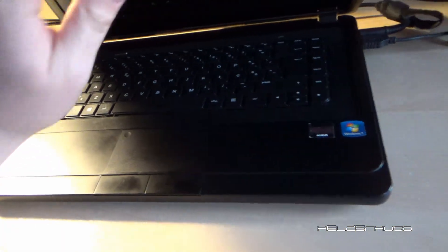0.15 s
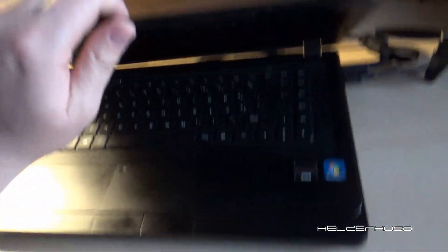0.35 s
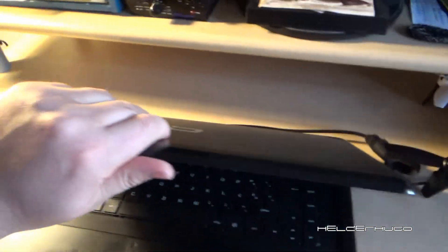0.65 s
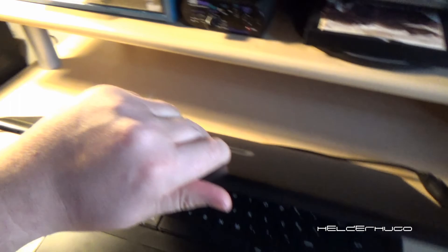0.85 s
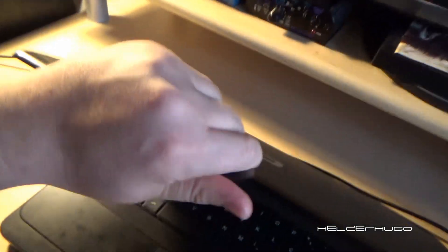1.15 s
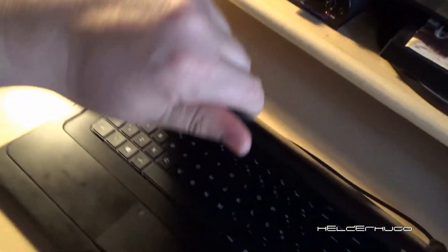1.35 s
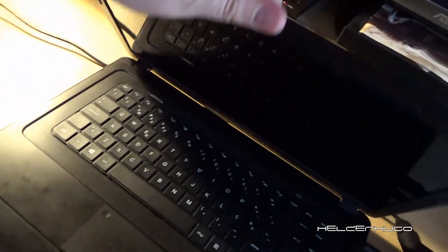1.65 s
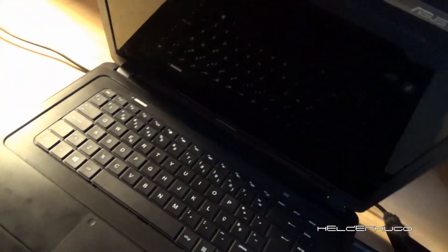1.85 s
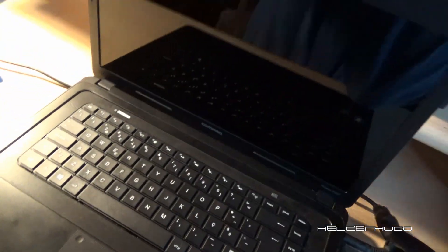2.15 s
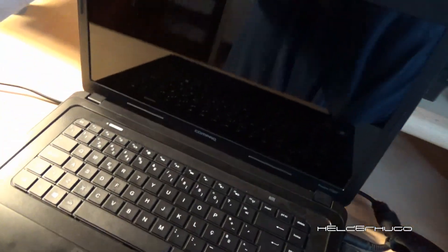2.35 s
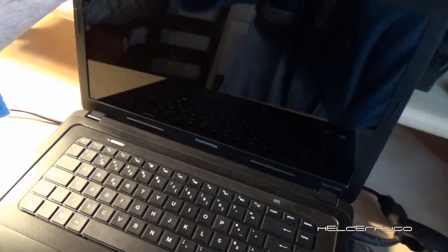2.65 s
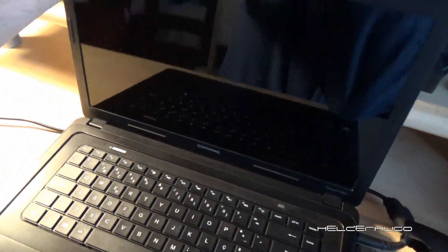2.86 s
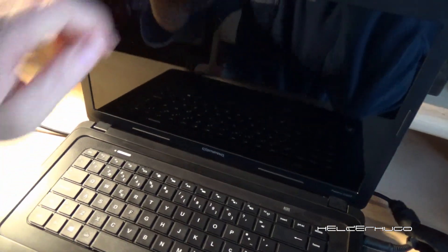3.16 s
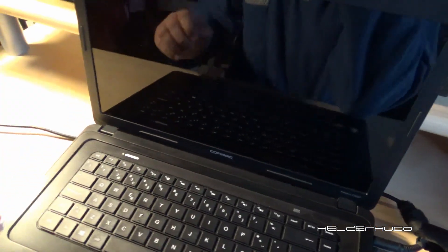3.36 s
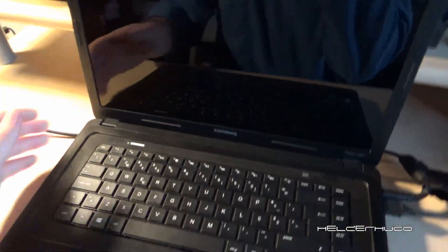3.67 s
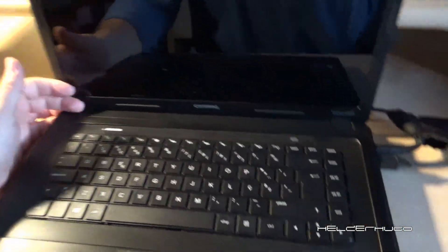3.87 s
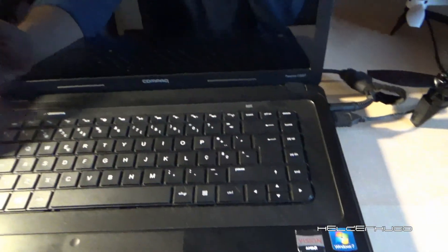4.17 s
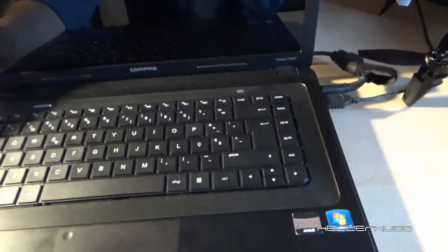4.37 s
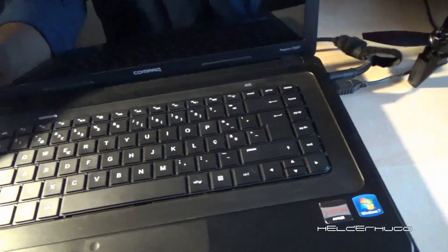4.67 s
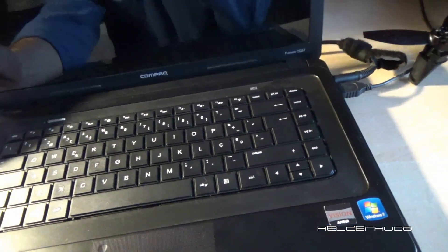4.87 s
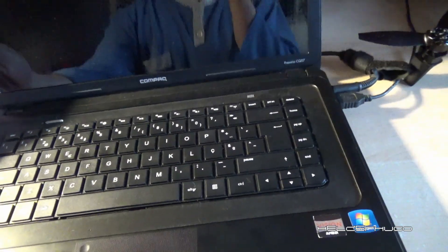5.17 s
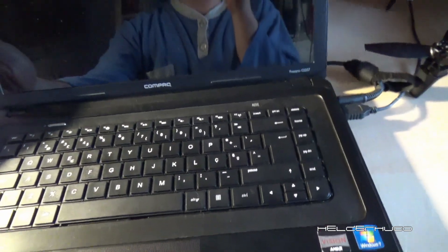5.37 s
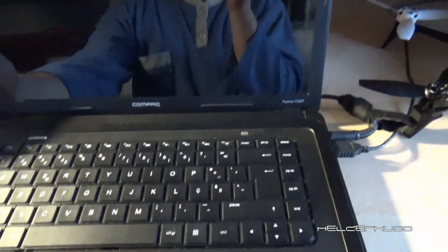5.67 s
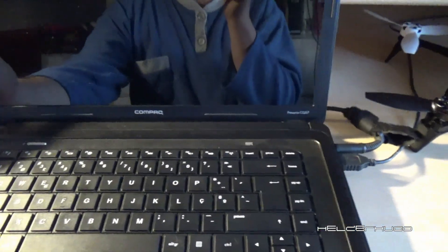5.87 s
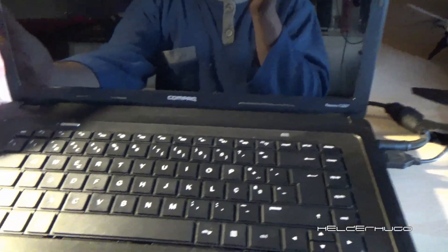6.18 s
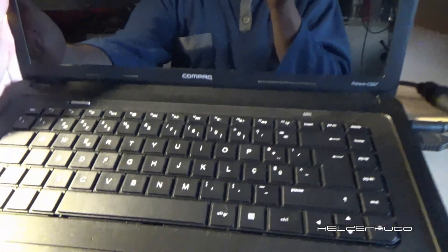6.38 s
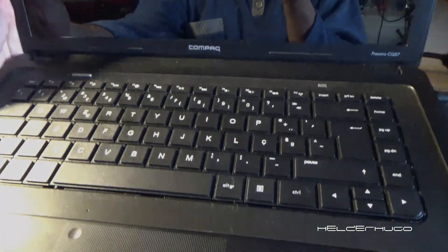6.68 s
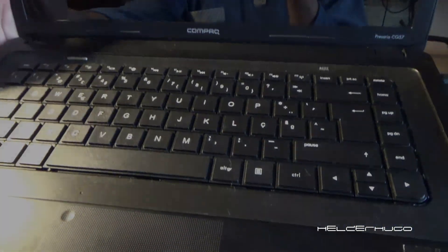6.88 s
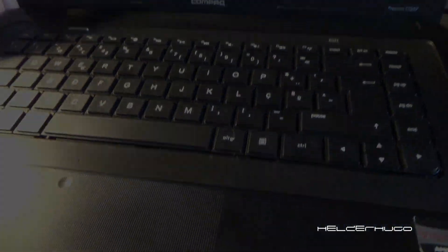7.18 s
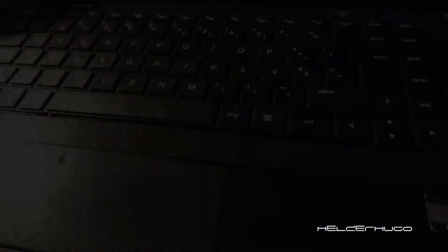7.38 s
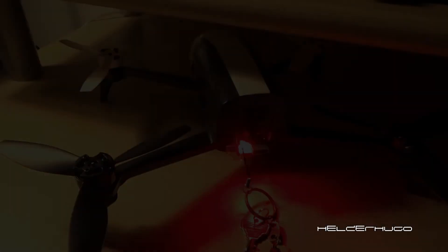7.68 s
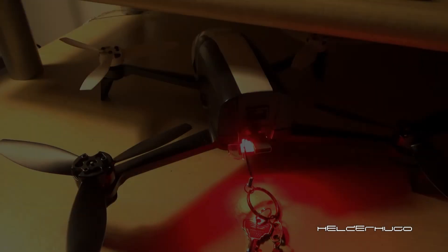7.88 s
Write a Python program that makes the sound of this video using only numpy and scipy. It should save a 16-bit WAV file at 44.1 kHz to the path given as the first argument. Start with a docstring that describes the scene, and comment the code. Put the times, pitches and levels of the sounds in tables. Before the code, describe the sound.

Close to the microphone in a small quiet room, a laptop lid rubs and its hinge scrapes with a burst of plastic clicks. Then heavy hammer blows from building work boom through the walls, a little under a second apart, with light case clicks and a short creak between. Blows and room tone fade, the last weaker, and a thin fan whine rises.

```python
"""Heavy hammer blows from building work come through the walls, a little under a second apart, and boom.
Close by, a hand opens a laptop: the lid rubs, the hinge scrapes, the plastic case clicks and creaks.
After the fifth blow the blows and room tone fade, to end early in the sixth; a small fan's thin whine fades in.
Blows are wave fronts, modes and a dense noise ring; clicks are noise bursts and shell modes;
rubbing is grainy noise through the shell's resonances; hum and fan are unsteady sines over coloured noise."""
import sys
import numpy as np
from scipy import signal
from scipy.fft import rfft, irfft, next_fast_len
from scipy.io import wavfile
from scipy.ndimage import uniform_filter1d

SR = 44100
rng = np.random.default_rng(int(sys.argv[2]) if len(sys.argv) > 2 else 0)


def transcribe(u):
    """Save the signal u as a 16-bit wav file named by the first command-line argument.

    u: samples, shape (n,) or (channels, n), limited to [-1, 1]; the rate is SR.
    q: integer samples, one column per channel.
    """
    v = np.clip(np.atleast_2d(u).T, -1, 1)
    q = np.round(v * 32767).astype(np.int16)
    wavfile.write(sys.argv[1], SR, q)


N = 354255
TIME = np.arange(N) / SR
FADE_OUT_S, CUT_S, FADE_IN_S = 6.626, 7.598, 8.35  # fade-out starts, silence between, fade-in ends

# push that turns the lid: (start [s], attack [s], hold [s], release t60 [s], level [dB])
LID_PUSH = (0.3945, 0.2047, 0.25, 0.46, -40.5)


def amp(db):
    """Decibels to gain."""
    return 10 ** (np.asarray(db) / 20)


def unit(x):
    """x at rms 1."""
    return x / np.sqrt(np.mean(x ** 2) + 1e-20)


def even(x):
    """Each channel at energy 1."""
    return x / np.linalg.norm(x, axis=1, keepdims=True)


def along(points, hz):
    """Interpolate (Hz, value) points on a log frequency axis."""
    f, v = np.transpose(points)
    return np.interp(np.log(hz + 1), np.log(f + 1), v)


def filtered(x, response):
    """Multiply the spectrum of x by a response of frequency."""
    n = x.shape[-1]
    m = next_fast_len(n + 8192)  # zero padding
    return irfft(rfft(x, m) * response(np.fft.rfftfreq(m, 1 / SR)), m)[..., :n]


def band(x, lo_hz, hi_hz):
    """A causal band-pass."""
    sos = signal.butter(3, [lo_hz, min(hi_hz, SR / 2 - 1)], "band", fs=SR, output="sos")
    return signal.sosfilt(sos, x)


def add(track, s, sound):
    """Mix a sound into a track at time s."""
    part = track[..., round(s * SR):][..., :sound.shape[-1]]
    part += sound[..., :part.shape[-1]]


def spread(pair, alike):
    """Two unrelated signals become left and right of a given likeness per frequency."""
    def turn_rad(hz):
        return np.arccos(np.clip(along(alike, hz), 0, 1)) / 2

    mid, side = filtered(pair, lambda hz: np.array([np.cos(turn_rad(hz)), np.sin(turn_rad(hz))]))
    return np.array([mid + side, mid - side])


def rush(spectrum):
    """Coloured stereo noise of rms 1."""
    # (frequency [Hz], left-right likeness [0..1])
    likeness = [(60, 1.0), (180, 0.99), (550, 0.79), (1650, 0.49), (4970, 0.75), (15000, 1)]
    noise = filtered(rng.standard_normal((2, N)), lambda hz: amp(along(spectrum, hz)))
    return unit(spread(noise, likeness))


def mode(t, hz, t60, rise):
    """A resonance that builds up and dies away."""
    return np.sin(2 * np.pi * hz * t) * amp(-60 * t / t60) * (1 - np.exp(-t / rise))


def hammer():
    """Every blow takes the same paths through the building; the ring changes as the strike spot moves."""
    # (time [s], level [dB], hardness: treble gain [dB])
    strikes = [(3.0337, -0.5, -7), (3.9058, 1, -10.5), (4.748, 1, -6.5), (5.6276, 1, -9.5),
               (6.5383, 0.5, -13), (7.3908, -3, -14.5)]
    # wave fronts and echoes of a blow: (delay [s], frequency [Hz], level [dB], half length [s])
    fronts = [(0.014, 381.8, 1.5, 0.0029), (0.0214, 307.7, -2.5, 0.0023), (0.049, 288.8, -7.5, .005),
              (.062, 183.3, -7, 0.01), (0.147, 190, -18, 0.0064), (0.218, 191.5, -30.5, 0.0073)]
    # modes of wall and room: (frequency [Hz], level [dB], t60 [s], build-up [s])
    boom_modes = [(113.8, -12, 0.55, 0.1), (169.2, -12.5, .52, 0.092), (176, -34.5, 0.73, .05),
                  (234, -25, 0.99, 0.017), (298.8, -11, 0.44, 0.037), (327, -22.5, 0.37, .02),
                  (400, -7.5, 0.14, 0.013), (467.6, -18, 0.49, 0.0082), (522, -19, 0.14, 0.015),
                  (649.5, -17, 0.45, 0.006), (826, -19, 0.32, 0.0087), (867, -22.5, 0.64, .012),
                  (1244, -24.5, 0.52, 0.0069)]
    spot_step_rad = 0.48
    t, out = np.arange(SR) / SR, np.zeros((2, N))

    body = sum(amp(db) * mode(t, hz, t60, rise) for hz, db, t60, rise in boom_modes)
    for delay, hz, db, length in fronts:
        body = body + amp(db) * np.sin(2 * np.pi * hz * t) * np.exp(-((t - delay) / length) ** 2)
    here, there = (dense_ring(t, burst_t60=0.12, rise_cycles=4.3) for _ in range(2))

    for k, (s, db, hard_db) in enumerate(strikes):
        spot_rad = k * spot_step_rad
        ring = np.cos(spot_rad) * here + np.sin(spot_rad) * there
        blow = body + amp(0.65) * ring
        blow = filtered(blow, lambda hz: amp(hard_db * along([(300, 0.13), (1000, 1)], hz)))
        add(out, s, amp(db) * blow * (1 - np.exp(-t / .0007)))
    return out


def dense_ring(t, burst_t60, rise_cycles, count=34):
    """Noise bands stand for countless building modes; high bands burst at once, low ones build up slowest."""
    # (frequency [Hz], t60 [s])
    ring_t60 = [(50, 0.73), (150, 0.88), (350, 0.48), (800, 0.56), (2000, 0.67), (6000, 1.2)]
    # hard first burst over the ring: (frequency [Hz], level [dB])
    burst_level = [(150, -16), (400, -8), (700, 4), (1300, 6.5), (3000, 9)]
    # (frequency [Hz], density [dB per Hz])
    masonry = [(30, -26.5), (70, -20.5), (145, -12.5), (195, -5.5), (300, -4), (430, -4.5), (560, -5),
               (800, -4.5), (1020, -13), (1300, -13.5), (1700, -19), (2700, -29.5), (4300, -43),
               (7000, -72)]
    # (frequency [Hz], left-right likeness [0..1])
    likeness = [(60, 0.98), (150, 1), (300, 0.93), (500, .83), (1000, .85), (2000, .25), (5000, .32)]
    out = np.zeros((2, len(t)))
    edges_hz = np.geomspace(25, 12000, count + 1)
    for lo, hi in zip(edges_hz, edges_hz[1:]):
        hz = np.sqrt(lo * hi)
        noise = filtered(rng.standard_normal(out.shape), lambda f: (f >= lo) & (f < hi))
        noise /= np.sqrt(np.abs(uniform_filter1d(noise ** 2, SR // 8)) + 1e-12)  # level its slow swells
        tail = amp(-60 * t / along(ring_t60, hz))
        burst = amp(along(burst_level, hz) - 60 * t / burst_t60)
        rise = 1 - np.exp(-(t / (0.006 + rise_cycles / hz)) ** 2)
        out += even(noise * (tail + burst) * rise) * amp(along(masonry, hz)) * np.sqrt(hi - lo)
    return spread(out, likeness)


def laptop():
    """Lid, hinge and case rub by stick and slip; the shell clicks."""
    # push on the hinge: (start [s], attack [s], hold [s], release t60 [s], level [dB])
    hinge_push = (0.44, 0.08, 0.42, 0.65, -47.5)
    # the case gives under the hand: (start [s], attack [s], hold [s], release t60 [s], level [dB])
    creak_push = (5.704, 0.02, 0.0059, 0.18, -21)
    # rubbed plastic: (frequency [Hz], density [dB per Hz])
    plastic = [(120, -25), (200, -1.5), (450, 1), (900, -8), (1400, -0.5), (2400, -5.5), (3500, -7.5),
               (5300, -17.5), (6600, -16.5), (8700, -16.5), (11700, -25), (16000, -38.5)]
    # scraping hinge: (frequency [Hz], density [dB per Hz])
    hinge_spectrum = [(300, -24), (1500, -12), (2600, 2), (3500, -2.5), (5500, -3), (7000, -6.5),
                      (9000, -7.5), (12000, -15.5), (16000, -24.5)]
    lid = friction(LID_PUSH, plastic, grit_db=3.5, slips=160)
    hinge = friction(hinge_push, hinge_spectrum, grit_db=1.5, slips=300)
    creak = friction(creak_push, plastic, grit_db=4.0, slips=400)
    creak = filtered(creak, lambda hz: amp(along([(1500, 1.5), (4000, -1), (12000, 4.5)], hz)))
    return lid + hinge + creak + clicks()


def clicks():
    """A click is a crunch of contact and a brief shell ring; sharp ones favour high ranges, which die first."""
    # (time [s], level [dB], brightness: gain from range to range [dB],
    #  hollowness: gain of the middle ranges [dB], t60 before each range's share [s])
    case_clicks = [(.414, -21, 3.5, -6.5, 0.084), (.508, -17, -4, -4.5, .022),
                   (.577, -24, -0.5, 1.5, 0.023), (.6, -18, 0.5, -4, 0.015), (.663, -21, -7, -1, 0.056),
                   (.688, -18.5, .5, -4.5, 0.038), (.73, -25, 5, -3, 0.027), (.749, -13, -1.5, -0.5, 0.027),
                   (.769, -7, 6.5, -2, .028), (.778, -1.5, 4.5, 0.5, 0.011), (.828, -19, -6.5, -2.5, .015),
                   (.878, -15.5, -2.5, 4, .023), (.958, -26.5, -3.5, 1, 0.071), (1.015, -23, -5, -8, 0.045),
                   (1.075, -23.5, -4.5, 2, 0.022), (1.229, -10.5, 0, 5, .03),
                   (1.264, -10, -1, -2.5, 0.0389), (1.284, -9, 3, -0.5, 0.043), (1.336, -14, 3.5, -1, .023),
                   (1.369, -17.5, 0.5, 4, .045), (1.377, -15.5, 2, -0.5, 0.052),
                   (2.507, -17.5, -2, -4.5, 0.052), (2.579, -36, -3.5, 3.5, 0.028),
                   (3.79, -15, -1.5, 7.5, .022), (3.872, -23, 5, -2, 0.13), (3.897, -6.5, 6, 1, .03),
                   (4.062, -25.5, 1.5, 2.5, 0.053), (4.393, -27.5, -3, -0.5, .02),
                   (4.711, -20.5, -1.5, 1, .05), (4.761, -22, -1.5, 5, 0.018),
                   (5.291, -19, -7.5, -1, 0.034), (5.559, -25, 0, -1.5, .012), (5.57, -20.5, 3, 4, .022),
                   (5.599, -18, 3, 2.5, .035), (5.825, -15.5, -1, 7, 0.029), (5.894, -26, 4.5, 5.5, .025),
                   (5.942, -21.5, -2.7, 6.5, .02), (6.119, -33.5, -7, -7, .035),
                   (6.228, -25, -2.5, 5.5, .019), (6.568, -29, -5, 9, .03), (7.266, -34.5, 3.5, -3.5, .08),
                   (7.289, -26.5, 4.5, -3.5, .026), (7.309, -30, 0.3, -3, 0.056),
                   (7.348, -35.5, -1.5, 7.5, 0.0083)]
    # shell ranges, knock to snap: (low [Hz], high [Hz], lift [dB], share of the click's t60)
    shell_ranges = [(403, 1000, 6, 1.8), (1000, 2500, 8.5, 1.3), (2560, 5600, 6.5, 0.98),
                    (6320, 11500, -6, 0.62)]
    t, out = np.arange(SR // 6) / SR, np.zeros((2, N))

    start, attack, hold = LID_PUSH[:3]
    handling = ticks(start, FADE_OUT_S, -41.5, count=22)
    slips = ticks(start + attack * .8, start + attack + hold + .08, -29.5, count=12)  # the turning hinge

    steps = np.arange(len(shell_ranges)) - (len(shell_ranges) - 1) / 2
    for s, db, bright_db, hollow_db, t60 in case_clicks + handling + slips:
        click = 0
        for step, (lo, hi, lift_db, share) in zip(steps, shell_ranges):
            envelope = amp(-60 * t / (share * t60)) * (1 - np.exp(-t / 0.00024))
            crunch = band(rng.standard_normal((2, len(t))) * envelope, lo, hi)
            ring = panel(t, lo, hi, 1.2 * share * t60)
            range_db = lift_db + bright_db * step + hollow_db * (1 - abs(step))
            click = click + amp(range_db) * (even(crunch) + amp(-6.0) * even(ring))
        add(out, s, amp(db) * click)
        add(out, s - .003, amp(db - 20.5) * click)  # a light touch precedes full contact
    return spread(out, [(300, 0.44), (1800, 0.84), (4000, 0.71), (9000, 0.46)])


def ticks(start, end, db, count):
    """Click rows for faint ticks, strewn over a stretch of time with scattered levels."""
    scatter_db, tilt_db, t60_s = 3, -2.5, .028
    when = start + (end - start) * (np.arange(count) + rng.random(count)) / count
    return [(s, db + scatter_db * z, tilt_db, 0, t60_s) for s, z in zip(when, rng.standard_normal(count))]


def panel(t, lo_hz, hi_hz, t60, count=7):
    """Each touched spot of the shell rings on a few modes of its own."""
    modes_hz = rng.uniform(lo_hz, hi_hz, count)
    return sum(rng.standard_normal((2, 1)) * mode(t, hz, t60, rise=0.00017) for hz in modes_hz)


def friction(push, spectrum, grit_db, slips):
    """Plastic sticks and slips: grains of uneven strength ring the shell."""
    return stroke(*push) * unit(case_colour(rush(spectrum) * grain(grit_db, slips), depth=0.94))


def stroke(start, attack, hold, release_t60, db):
    """Gain per sample of a push that grows, holds and dies away."""
    t = TIME - start
    return np.clip(t / attack, 0, 1) * amp(db - 60 * np.maximum(t - attack - hold, 0) / release_t60)


def grain(grit_db, slips):
    """An uneven gain that takes so many random values a second."""
    return unit(amp(grit_db * np.interp(TIME * slips, np.arange(N), rng.standard_normal(N))))


def case_colour(x, depth):
    """The laptop shell colours sound with its own resonances."""
    # (frequency [Hz], width [Hz], level [dB])
    resonances = [(750, 130, 4), (1110, 140, 2), (2180, 160, -9), (2610, 130, -3), (2980, 160, -5.5),
                  (4160, 330, -3), (5600, 460, -2.5), (8800, 440, -12)]

    def shell(f):
        return sum(amp(db) * 1j * f * w / (c * c - f * f + 1j * f * w) for c, w, db in resonances)

    return filtered(x, lambda f: 1 + depth * shell(f))


def room(x, t60):
    """The small room answers near sounds with a dull, short noise tail."""
    t = np.arange(SR // 2) / SR
    tail = band(rng.standard_normal((2, len(t))), 220, 7500) * amp(-60 * t / t60) * (1 - np.exp(-t / .004))
    return signal.fftconvolve(x, tail / np.linalg.norm(tail[0]), axes=1)[:, :N]


def bumps():
    """The base rocks on the desk: soft low pushes of three decaying modes."""
    # (time [s], level [dB])
    rocks = [(0.773, -26), (0.889, -28.5), (1.013, -28), (1.066, -26), (1.222, -23.5), (1.263, -24.5),
             (2.509, -27)]
    t, out = np.arange(SR // 4) / SR, np.zeros(N)
    push = mode(t, hz=73.9, t60=.09, rise=0.0025) + mode(t, hz=128.0, t60=.07, rise=0.0016)
    push = push + .6 * mode(t, hz=217, t60=0.064, rise=0.00086)
    for s, db in rocks:
        add(out, s, amp(db) * push)
    return out


def rustle_and_hiss():
    """Grainy rustle like a brushing sleeve, and a high background hiss, swell and ebb."""
    # (middle [s], half length [s], rustle level [dB], high hiss level [dB])
    swells = [(0, .05, -54, -66), (1.3, .12, -56, -61.5), (1.65, 0.12, -62, -64.5), (2.25, .22, -75, -63.5),
              (3.42, 0.052, -59.5, -59), (3.66, 0.1, -66, -65), (4.06, .1, -44, -58.5),
              (4.194, .03, -43.5, -67.5), (4.339, 0.059, -52.5, -63), (4.623, 0.12, -49.5, -59),
              (5.11, .055, -48.5, -68), (5.4, .12, -56.5, -72), (5.898, .18, -57.5, -70.5)]
    # rustle like cloth: (frequency [Hz], density [dB per Hz])
    rustle_spectrum = [(300, -1.5), (1000, 11), (3200, 4.5), (6500, -7.5), (9000, -12), (14000, -26)]
    # high hiss: (frequency [Hz], density [dB per Hz])
    high_hiss_spectrum = [(4000, -24.5), (7000, -2.5), (9500, 0), (12000, -8), (15500, -13)]
    rustle, high_hiss = amp(-72), amp(-78)  # what stays between swells
    for s, length, rustle_db, high_hiss_db in swells:
        swell = (1 + ((TIME - s) / length) ** 2) ** -.9
        rustle = np.hypot(rustle, amp(rustle_db) * swell)
        high_hiss = np.hypot(high_hiss, amp(high_hiss_db) * swell)
    noise = rustle * rush(rustle_spectrum) + high_hiss * rush(high_hiss_spectrum)
    return grain(grit_db=1.7, slips=70) * noise


def cooling_fan():
    """A small motor's unsteady tones over the noise of moved air."""
    # (frequency [Hz], level [dB])
    motor_lines = [(118.4, -57.5), (203, -60.5), (915.2, -55), (2923, -59), (4382, -67), (5846, -77.5),
                   (7305, -82)]
    # (frequency [Hz], density [dB per Hz])
    moved_air = [(30, -10), (110, 0), (300, -9), (1500, -9), (3500, -15.5), (6500, -22.5), (10000, -15),
                 (12000, -24), (15000, -32)]
    return amp(-51.0) * rush(moved_air) + whine(motor_lines, waver_hz=0.81)


def room_tone():
    """Steady coloured noise, low hum and a faint pulsing tone."""
    # (frequency [Hz], density [dB per Hz])
    still_air = [(15, -34.5), (30, -10), (55, -9), (90, -5), (123, -2), (150, -9), (240, -6), (400, -13.5),
                 (750, -13.5), (1150, -17.5), (1800, -24.5), (4500, -29), (7000, -38.5), (16000, -50.5)]
    # (frequency [Hz], level [dB])
    hum_lines = [(75.4, -68), (118.4, -59), (253, -67.5)]
    hum = whine(hum_lines, waver_hz=2.5)
    return amp(-50.5) * rush(still_air) + hum + chirr(hz=4790, db=-73.0, pulse_hz=13)


def whine(lines, waver_hz):
    """Sines whose frequencies waver slowly at random."""
    def drift():
        return np.cumsum(np.interp(TIME * 10, np.arange(N), rng.standard_normal(N))) / SR

    return sum(amp(db) * np.sqrt(2) * np.sin(2 * np.pi * (hz * TIME + waver_hz * drift()))
               for hz, db in lines)


def chirr(hz, db, pulse_hz):
    """A faint electrical tone pulses on and off."""
    return whine([(hz, db)], waver_hz=15) * np.abs(np.sin(np.pi * pulse_hz * TIME)) ** 6


def scene():
    """Blows, rustle, hiss and room tone fade out, the fan fades in; the laptop keeps its level."""
    far = hammer()
    background = rustle_and_hiss() + room_tone()
    case = laptop()
    near = case + amp(-22.5) * room(case, t60=0.33) + amp(-3.0) * bumps()
    leaving = np.clip((CUT_S - TIME) / (CUT_S - FADE_OUT_S), 0, 1)
    coming = np.clip((TIME - CUT_S) / (FADE_IN_S - CUT_S), 0, 1)
    return near + leaving * (far + background) + coming * cooling_fan()


def record(dry):
    """The loudest peaks are rounded off at full scale, and the top is cut."""
    held = dry / (1 + np.abs(dry) ** 8) ** (1 / 8)
    return filtered(held, lambda hz: hz < 16000)


dry = scene()
out = record(dry)
transcribe(out)
```